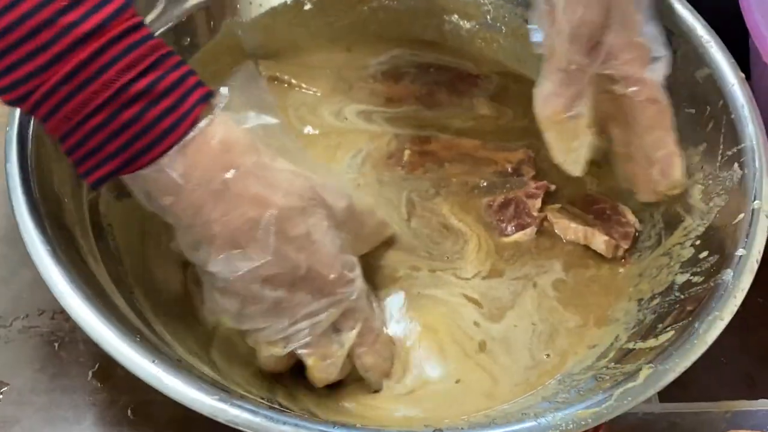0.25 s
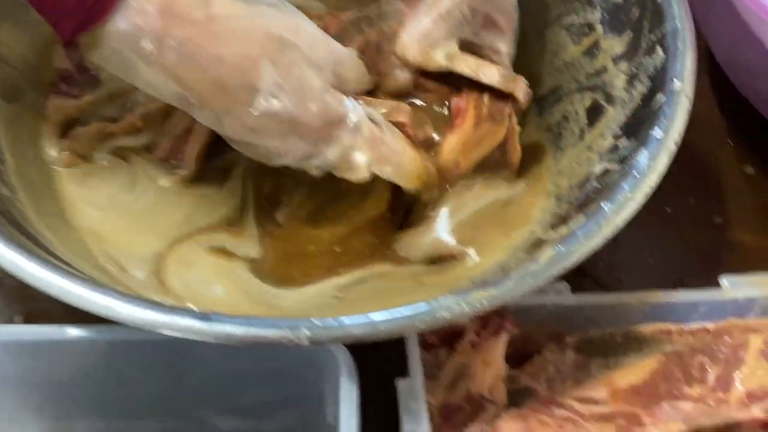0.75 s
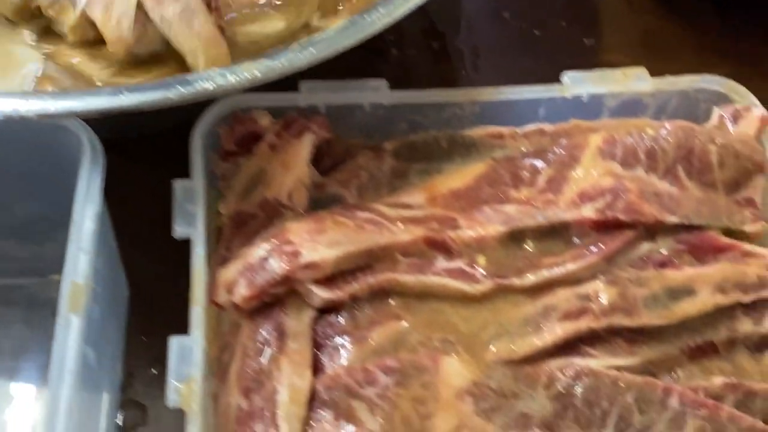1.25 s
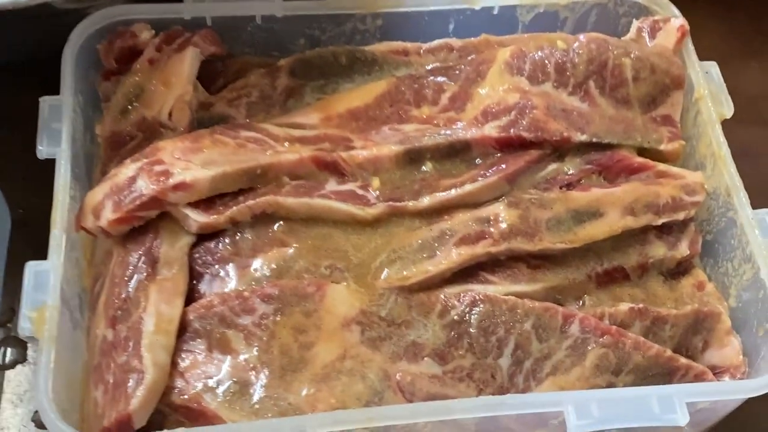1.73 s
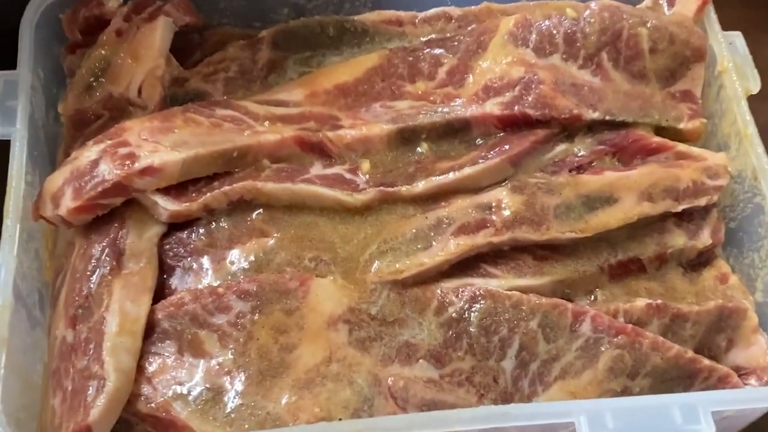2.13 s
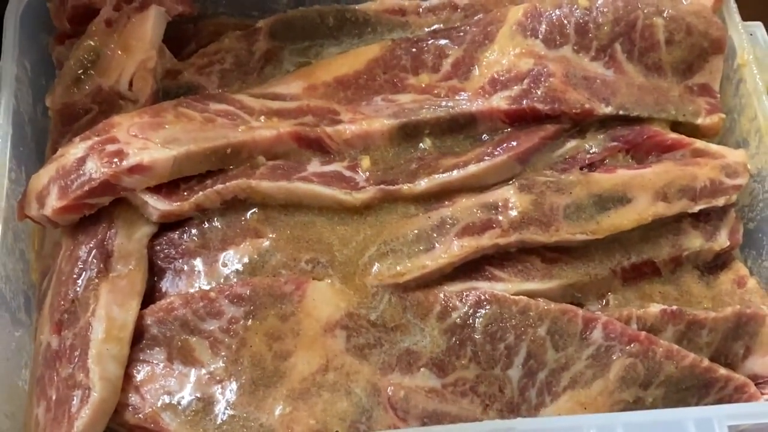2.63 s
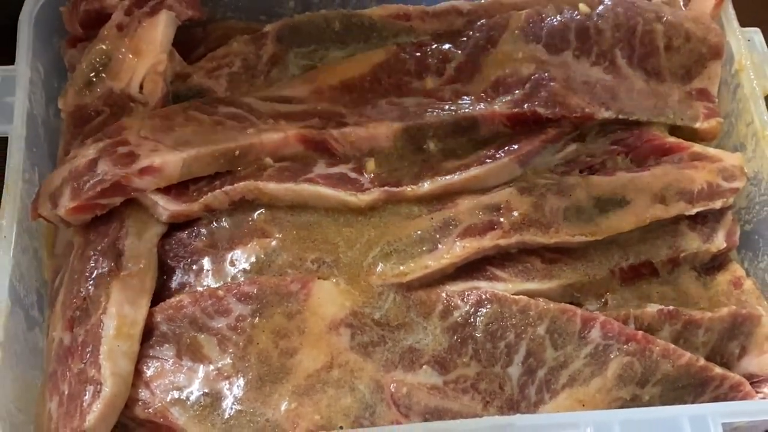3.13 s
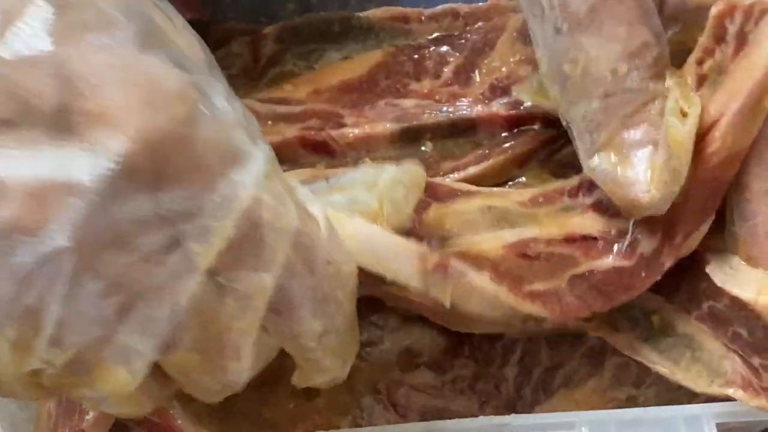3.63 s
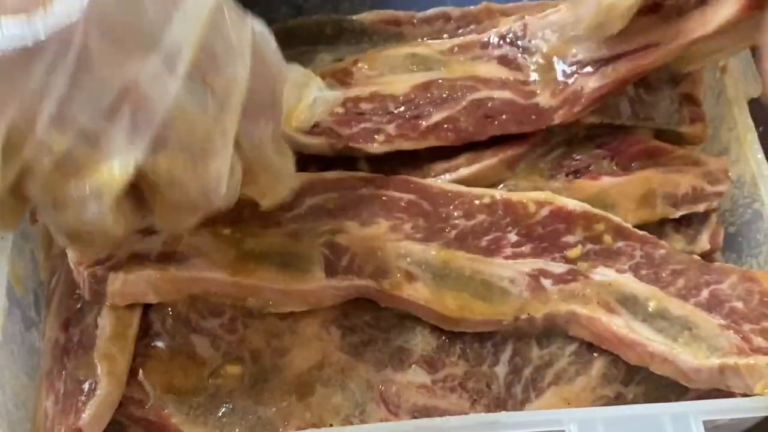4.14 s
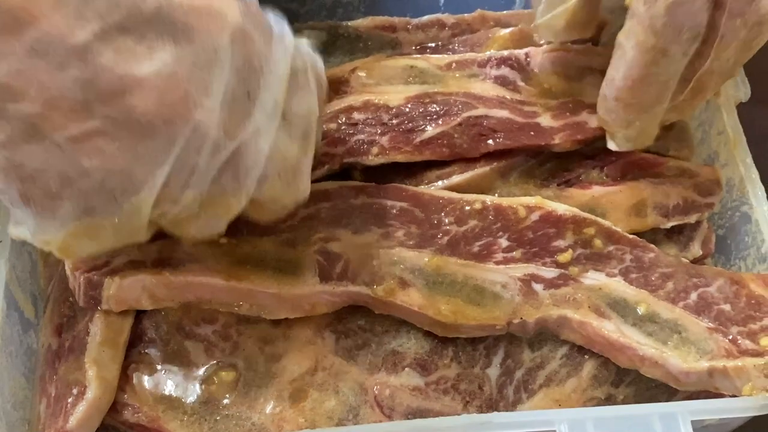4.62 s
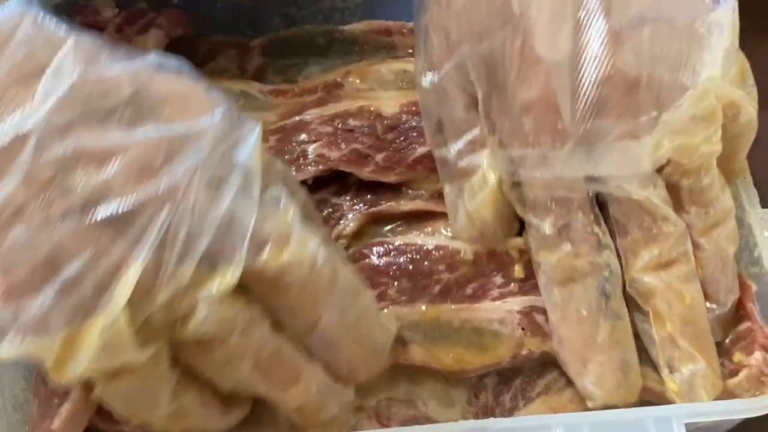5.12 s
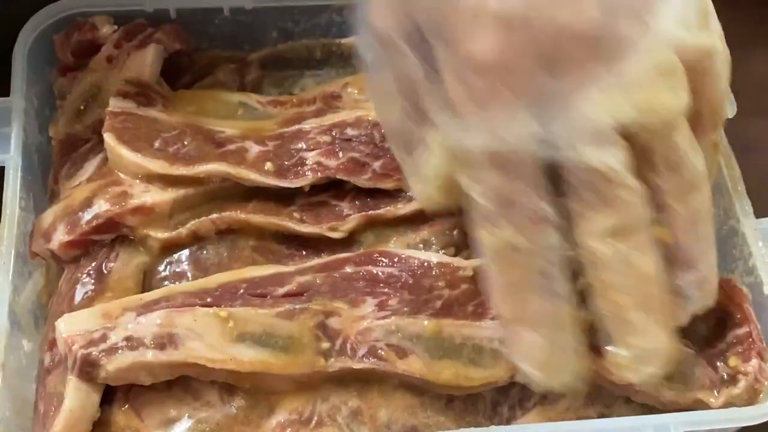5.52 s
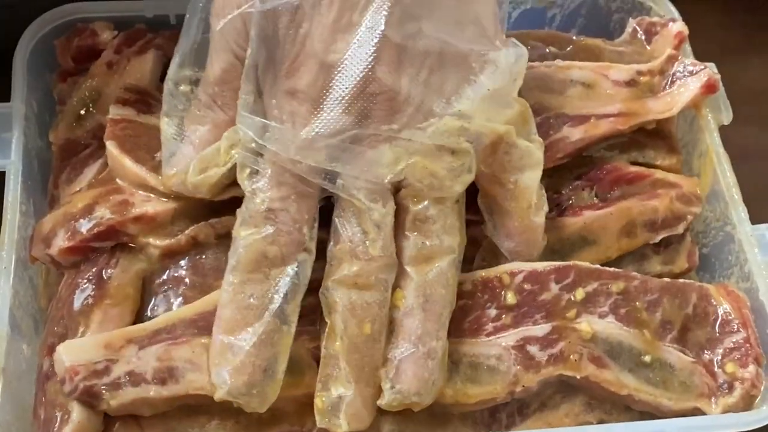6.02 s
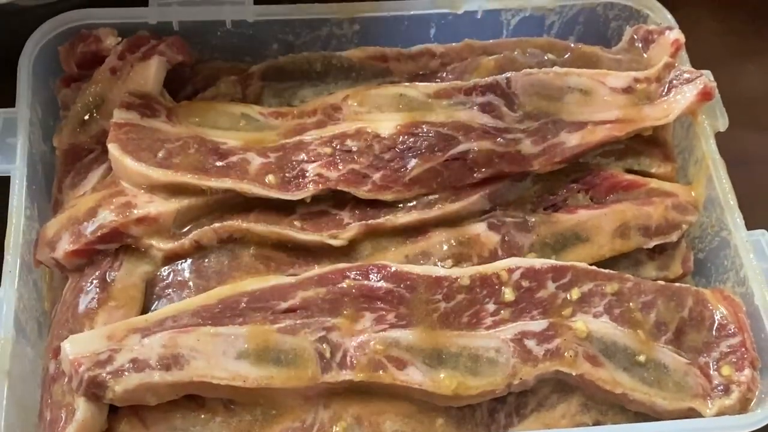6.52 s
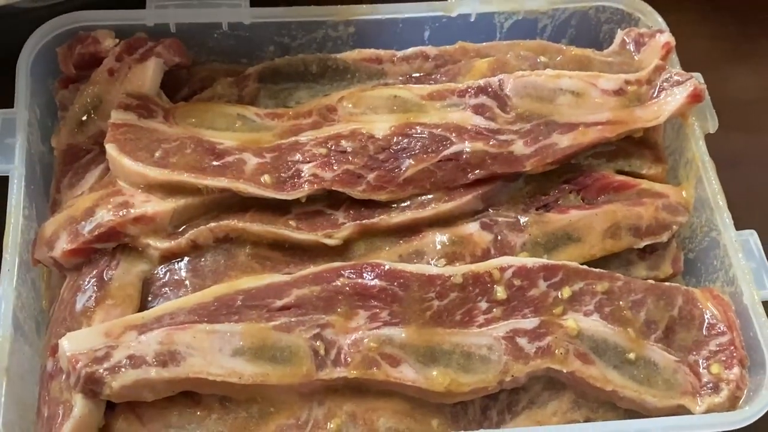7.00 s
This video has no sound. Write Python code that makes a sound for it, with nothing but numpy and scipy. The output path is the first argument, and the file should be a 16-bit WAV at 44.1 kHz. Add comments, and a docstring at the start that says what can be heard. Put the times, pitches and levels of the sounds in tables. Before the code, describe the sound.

Close kitchen handling of slimy marinated ribs: rustling film gloves, soft squishes and snaps, low rumble, and finally one hard, resonant table knock.

```python
"""Hands in thin plastic gloves move marinated ribs from a steel bowl to a plastic box, in a kitchen.
From the start, grain swarms make film crinkle and wet squelch; decaying tones make snaps, plops and bumps.
At 1.6 s damped modes make the box clack and rattle; from 2.3 s the low noise rumble eases by 4 dB.
Near 6.7 s a heavy edge knocks: a burst of contacts and noise, with the table's modes ringing on.
A faint appliance hum, a sine with coloured noise, and room air run throughout."""
import sys
import numpy as np
from scipy import signal
from scipy.fft import rfft, irfft, next_fast_len
from scipy.io import wavfile
from scipy.ndimage import uniform_filter1d

SR = 44100
rng = np.random.default_rng(int(sys.argv[2]) if len(sys.argv) > 2 else 0)


def wav_record(signal):
    """Record a signal, one row per channel, as 16-bit PCM in the file named by sys.argv[1]."""
    frames = np.transpose(np.atleast_2d(signal))
    bounded = np.clip(frames, -1, 1)
    # unit amplitude maps onto the largest positive 16-bit level
    quanta = np.round(bounded * 32767).astype(np.int16)
    wavfile.write(sys.argv[1], SR, quanta)


N = 320166  # samples

# spectrum of crinkling film: (frequency [Hz], relative level per Hz [dB])
FILM_SPECTRUM = [(500, -18), (1300, -5), (1900, -4.5), (2500, 0), (3500, -0.5), (4300, -4.5), (5600, -1.5),
                 (7300, -2.5), (8800, -9.5), (12500, -14.5), (16000, -20.5)]


def gloves():
    """Folds buckle in swarms; stronger effort is denser, louder, fuller; light effort thin, near 5 kHz."""
    level_db = hand_effort(column=0)
    speed = amp(level_db + 47)
    fold_rate_hz = np.clip(2500 * speed, 70, 6000)
    pop_rate_hz = np.clip(800 * speed, 50, 2000)
    folds = grains(fold_rate_hz, hz=5294, spread=1.705, cycles=0.576, size_db=4.0, glide=0, size=128)
    # wet film peeling off the meat pops with a pitch of its own
    pops = grains(pop_rate_hz, hz=3413, spread=1.36, cycles=2.3, size_db=4.0, glide=0.062, size=320)
    firm = patchy(coloured(folds + amp(-3.5) * pops, FILM_SPECTRUM), depth_db=1.6)
    light = coloured(firm, [(1500, -3.0), (5000, 9.5), (8000, -2.5), (15000, -6)])
    firm_share = np.clip(2.68 * speed, 0, 1)
    film = steadied(firm_share * firm + (1 - firm_share) * light, seconds=0.0312)
    return in_kitchen(amp(level_db) * film, wet_db=-9, near_db=-5)


# spectrum of squeezed wet meat: (frequency [Hz], relative level per Hz [dB])
WET_SPECTRUM = [(120, -11), (300, -8.5), (450, -5.5), (700, -4), (1080, 0), (1400, -7.5), (2000, -10),
                (3500, -10.5)]


def squelch():
    """Small air pockets burst in the marinade as the meat is squeezed."""
    level_db = hand_effort(column=1)
    bubbles = grains(900, hz=889.2, spread=1.3645, cycles=2.57, size_db=3.5, glide=0.152, size=640)
    bubbles = steadied(coloured(bubbles, WET_SPECTRUM), seconds=0.0276)
    return in_kitchen(amp(level_db) * bubbles, wet_db=-7, near_db=-11.0)


# single film folds and wet films that snap: (time [s], level [dB], pitch [Hz])
FILM_SNAPS = [(.023, -30.5, 4000), (0.2207, -31, 4740), (0.8747, -24.5, 5860), (1.1555, -35, 2290),
              (1.414, -32, 2930), (1.5551, -36, 2660), (2.132, -31.5, 6800), (2.459, -30, 4261),
              (2.602, -32.5, 7750), (2.928, -32, 3580), (3.1871, -34, 2131), (3.21, -34.5, 5944),
              (3.249, -31, 2660), (3.489, -31.5, 5762), (3.5476, -31, 6205), (3.5719, -28.5, 2860),
              (3.7271, -34.5, 3309), (3.8767, -31, 6520), (3.8944, -22.5, 3596), (3.9507, -29, 5700),
              (4.0198, -26.5, 2590), (4.041, -26, 5870), (4.156, -32, 2400), (4.175, -32.5, 3930),
              (4.217, -19, 3665), (4.4094, -22, 6601), (4.703, -29, 5550), (4.7541, -27, 6063),
              (5.8154, -30.5, 4409), (6.1253, -30.5, 3125), (6.19, -30, 3300), (6.3225, -34, 2700),
              (6.367, -30, 7195), (6.413, -31, 5208), (6.6909, -36.5, 3439), (6.774, -36, 5342),
              (6.94, -40.5, 6000), (7.114, -48, 4400)]


def snaps():
    """A larger fold flips over: a sharp tick and a few cycles of its own pitch."""
    out, t = np.zeros(N), np.arange(SR // 50) / SR
    for s, db, hz in FILM_SNAPS:
        tone = np.sin(2 * np.pi * hz * t) * np.exp(-hz * t / 4.13)
        tick = 0.81 * rng.standard_normal(len(t)) * np.exp(-t / 0.00187)
        add(out, s, amp(db) * (tone + tick))
    out = coloured(out, [(200, -9.5), (1200, -13.5), (2800, -3.5), (7500, -1.5), (9500, -10.5), (15000, -20.5)])
    return in_kitchen(out, wet_db=-12.5, near_db=-10.5)


# blobs of marinade and meat that plop: (time [s], level [dB], starting pitch [Hz])
MEAT_PLOPS = [(.927, -29.5, 1301), (0.9297, -30, 984), (.938, -31.5, 1081), (.993, -38.5, 1004),
              (1.414, -35, 1453), (1.724, -37, 574), (1.736, -36.5, 902), (1.838, -39, 867),
              (2.195, -41.5, 1097), (3.096, -44, 904), (3.486, -35.5, 951.3), (3.489, -36, 506),
              (5.322, -35.5, 939.2), (5.875, -32.5, 589.9), (6.54, -35.5, 948.7)]


def plops():
    """A trapped pocket of air rings briefly and rises in pitch, with a little spatter."""
    out, t = np.zeros(N), np.arange(SR // 12) / SR
    for s, db, hz in MEAT_PLOPS:
        tone = np.sin(2 * np.pi * hz * t * (1 + 2.5 * t))
        pocket = tone * np.exp(-hz * t / 2.28) * (1 - np.exp(-t / 0.00033))
        spatter = softened(rng.standard_normal(len(t)), hz * 2.27) * np.exp(-t / 0.0194)
        spatter -= softened(spatter, hz / 3)
        add(out, s, amp(db) * (crest(pocket) + 0.319 * crest(spatter)))
    return in_kitchen(out, wet_db=-2.5, near_db=-1.5)


# contacts of the heavy edge as it chatters and settles: (time [s], level [dB], pitch [Hz])
KNOCK_CONTACTS = [(6.7193, -15, 638.5), (6.722, -2, 720), (6.7266, -6, 1110), (6.73, -2.5, 1375),
                  (6.7432, -30.5, 900), (6.7503, -21, 805), (6.774, -18.5, 1090), (6.838, -19, 760),
                  (6.874, -25.5, 553.8)]
# table modes, also woken by bumps: (frequency [Hz], relative level [dB], t60 [s])
TABLE_MODES = [(116.22, -3.5, 0.8327), (147, -4, 0.8214), (171.6, -3.5, 0.67), (221.7, -2, 0.649),
               (298.8, -6.5, 0.42), (391.3, 0.5, 0.15), (491, 1, 0.2615), (516.6, -17.5, 0.4285),
               (667, 0, 0.26), (764.7, -6.5, 0.46), (832.5, 3, 0.354), (865, -12.5, 0.37), (1043, 0, 0.264),
               (1085.3, 5, 0.26), (1190, -2, 0.216), (1830, -17, 0.235), (2450, -17, 0.156),
               (2665, -7.5, 0.158), (3794, -14.5, 0.212)]
# spectrum of the heavy thud: (frequency [Hz], relative level [dB])
THUD_SPECTRUM = [(40, -9.5), (80, -7.5), (130, -0.5), (320, -3), (500, 3), (1150, 1.5), (1600, -16),
                 (2700, -20.5), (4200, -29.5), (7500, -40), (15000, -63)]


def knock():
    """A heavy edge hits the table in quick contacts; the table rings on and the room answers."""
    blows, out, t = np.zeros(N), np.zeros(N), np.arange(SR * 3 // 4) / SR
    for s, db, hz in KNOCK_CONTACTS:
        add(blows, s, amp(db) * np.sin(2 * np.pi * hz * t) * np.exp(-hz * t / 0.55))
    out += amp(-8.5) * crest(coloured(blows, THUD_SPECTRUM))
    # countless close modes blur into a shudder: a quick part and the long tail of the room
    fading = np.exp(-t / 0.0126) + amp(-5.5) * amp(-60 * t / 0.477)
    shudder = unit(coloured(rng.standard_normal(len(t)), THUD_SPECTRUM)) * fading
    crack = softened(rng.standard_normal(len(t)), hz=3300) * np.exp(-t / 0.0059)
    modes = ring(TABLE_MODES, t, scatter_db=-1.5) * (1 - np.exp(-t / 0.00156))
    first_contact_s = KNOCK_CONTACTS[0][0]
    add(out, first_contact_s, amp(-20) * shudder + amp(-24.5) * crack + amp(-31.5) * modes)
    return out


# flick and brief rattle of the box: (time [s], level [dB])
BOX_CLACKS = [(1.5684, -27.5), (1.577, -40.5), (1.5837, -41.5), (1.593, -52)]
# plastic box modes: (frequency [Hz], relative level [dB], t60 [s])
BOX_MODES = [(458.9, -18.5, 0.0501), (515.8, -15.5, 0.14), (611, -14.5, 0.069), (785.8, -13, 0.057),
             (952, -16.5, 0.036), (1691, -18.5, 0.065), (2836, 1.5, 0.0127), (3050, -18, 0.086),
             (3419, -13, 0.061), (3784, -4.5, 0.033), (4510, -2, 0.0086), (6220, 1.5, 0.0063),
             (7300, 1, 0.0069), (7870, -4, 0.0088), (10240, -3.5, 0.0062)]


def box_clack():
    """Something hard flicks the plastic box, which rattles to rest."""
    out, t = np.zeros(N), np.arange(SR // 6) / SR
    for s, db in BOX_CLACKS:
        crack = 1.22 * rng.standard_normal(len(t)) * np.exp(-t / 0.00091)
        add(out, s, amp(db) * (ring(BOX_MODES, t, scatter_db=1.0) + crack))
    out = coloured(out, [(800, 7), (1400, 3.5), (2300, -5), (2800, -1.5), (7800, 2), (9000, -2.0), (15000, -8)])
    return in_kitchen(out, wet_db=-9.5, near_db=-8.0)


# dull bumps on the table top: (time [s], level [dB], brightness [Hz])
TABLE_BUMPS = [(0.119, -41, 403), (1.149, -42.5, 126), (1.729, -36, 169), (1.825, -32, 102),
               (2.41, -41, 171.1), (4.304, -37, 505), (4.338, -37, 55.04), (5.517, -39.5, 331.5)]


def bumps():
    """Soft weight lands on the table: a short dull shudder and mostly its lower modes."""
    out, t = np.zeros(N), np.arange(SR // 2) / SR
    for s, db, hz in TABLE_BUMPS:
        shudder = softened(rng.standard_normal(len(t)), hz * 2.5) * amp(-60 * t / 0.092)
        shudder -= softened(shudder, hz / 4)
        modes = softened(ring(TABLE_MODES, t, scatter_db=1), hz) * amp(-60 * t / 0.96)
        bump = amp(1.5) * crest(shudder) + amp(-3.5) * crest(modes)
        add(out, s, amp(db) * softened(bump, hz * 1.44))
    return in_kitchen(out, wet_db=-10.5, near_db=-14)


# meat's weight shifting in bowl or box: (start [s], length [s], level [dB])
MEAT_SHOVES = [(.04, 0.074, -47), (.3, 0.903, -44), (1.33, 0.176, -51.5), (1.7, 0.697, -51.5),
               (3.15, 0.152, -51.5), (4.31, 0.079, -44), (6.7, 0.086, -40)]
# spectra of low rumble, soft jostling, room air: (frequency [Hz], relative level per Hz [dB])
RUMBLE_SPECTRUM = [(2, -12.5), (7, 7), (14, 1.5), (22, -10.5), (30, -7), (42, -30), (70, -34), (150, -88)]
JOSTLE_SPECTRUM = [(25, -29), (52, 7.5), (76, 0.5), (100, -22.5), (200, -26.5), (400, -46), (1000, -76.5)]
AIR_SPECTRUM = [(59, -28.5), (100, -5), (113, -3.5), (236, -3.5), (407, -9.5), (452, -7.5), (1070, -11),
                (2130, -15.5), (2420, -15.5), (4350, -20.5), (8000, -30.5), (12200, -36.5), (15000, -72)]
REST_JOSTLE_DB = -54  # the table under leaning arms
RUMBLE_EASE_START_S, RUMBLE_EASE_LENGTH_S = 2.325, 0.38
RUMBLE_EARLY_DB, RUMBLE_LATE_DB = -32, -36


def background():
    """Low rumble and soft jostling as steadied noise; hum as a sine in noise; room air as noise."""
    t = np.arange(N) / SR
    ease_s = [RUMBLE_EASE_START_S, RUMBLE_EASE_START_S + RUMBLE_EASE_LENGTH_S]
    rumble_db = np.interp(t, ease_s, [RUMBLE_EARLY_DB, RUMBLE_LATE_DB])
    rumble = amp(rumble_db) * steadied(noise(RUMBLE_SPECTRUM), seconds=0.458)
    jostle_db = effort(MEAT_SHOVES, REST_JOSTLE_DB)
    jostle = amp(jostle_db) * steadied(noise(JOSTLE_SPECTRUM), seconds=0.0765)
    hum = amp(-62) * np.sin(2 * np.pi * 149.5 * t)
    fan = amp(-63.0) * noise([(200, -19.0), (450, -6.0), (700, -5), (1100, -3.0), (1400, -16.5), (3000, -37)])
    air = amp(-60) * noise(AIR_SPECTRUM)
    return rumble + jostle + hum + fan + air


# grips, lifts, presses: (start [s], length [s], glove crinkle level [dB], wet squelch level [dB])
HAND_STROKES = [(0.0, 0.19, -52.5, -56), (0.202, 0.2563, -54, -54.5), (.45, 0.292, -55.5, -58),
                (.75, .07, -49.5, -51), (0.949, 0.0672, -49, -62.5), (1.129, 0.3764, -57, -52),
                (1.591, .1, -57.5, -61.5), (1.785, 0.0516, -51.5, -51), (1.9, 0.151, -53.5, -56),
                (2.148, 0.1008, -50, -51.5), (2.32, 0.0628, -50.5, -53.5), (2.489, 0.133, -57.5, -62.5),
                (2.62, 0.1376, -57.5, -63.5), (2.873, 0.0633, -59, -66), (3.129, .135, -60.5, -62),
                (3.369, 0.1082, -47.5, -51), (3.527, 0.0968, -51.5, -57.5), (3.709, 0.1833, -57, -61),
                (3.94, 0.1342, -47, -52), (4.152, 0.119, -50, -56.5), (4.309, 0.1603, -49, -48),
                (4.561, 0.0984, -48, -50.5), (4.716, 0.15, -44.5, -49.5), (4.848, 0.1337, -46, -49.5),
                (5.074, .14, -50, -53), (5.259, 0.1091, -49, -46), (5.306, 0.0412, -45.5, -44),
                (5.435, 0.0743, -46.5, -49), (5.542, 0.067, -59, -60), (5.698, 0.2972, -53, -53.5),
                (5.8, 0.139, -52, -51), (5.855, 0.0264, -56, -45), (6.107, 0.1218, -52, -56),
                (6.259, 0.1286, -52, -56), (6.52, 0.099, -58, -60), (6.716, 0.236, -65.5, -63.5)]
# light contact that goes on between strokes: (time [s], level [dB])
LIGHT_CONTACT = [(0.0, -61.5), (2.4, -61.5), (2.9, -74), (3.3, -74), (4.2, -61), (5.2, -62), (6.4, -62),
                 (7.0, -77)]


def hand_effort(column):
    """Level in dB of the strokes over the light contact; column 0 is the glove, 1 the wet meat."""
    contact_db = np.interp(np.arange(N) / SR, *np.transpose(LIGHT_CONTACT))
    strokes = [(start, length, levels[column]) for start, length, *levels in HAND_STROKES]
    return effort(strokes, contact_db)


ATTACK_S, RELEASE_S = .03, .03  # linear onset; decay to 1/e
ARCH_DB = 1.58  # middle of a stroke over its ends


def effort(strokes, rest_db):
    """Level in dB of (start, length, dB) strokes: each takes hold, swells to its middle and lets go."""
    t = np.arange(N) / SR
    power = np.full(N, amp(rest_db) ** 2)
    for start, length, db in strokes:
        age = t - start
        grip = np.clip(age / ATTACK_S, 0, 1) * np.exp(-np.maximum(age - length, 0) / RELEASE_S)
        arch_db = ARCH_DB * (np.sin(np.pi * np.clip(age / length, 0, 1)) - .5)
        power += (grip * amp(db + arch_db)) ** 2
    return 10 * np.log10(power)


# decay of the room: (frequency [Hz], t60 [s])
KITCHEN_DECAY = [(120, 0.706), (500, 0.413), (1200, 0.424), (4000, 0.56), (12000, 0.218)]


def in_kitchen(x, wet_db, near_db):
    """Direct sound, quick echoes off table and bowl, and the softened tail of the room."""
    hz, t, z = signal.stft(rng.standard_normal(SR * 3 // 4), SR, nperseg=256)
    decay_db = -60 * t / along(KITCHEN_DECAY, hz)[:, None]
    tail = signal.istft(z * amp(decay_db), SR, nperseg=256)[1]
    age = np.arange(len(tail)) / SR
    tail *= 1 - np.exp(-age / 0.00187)
    near = rng.standard_normal(len(tail)) * age * amp(-60 * age / 0.01433)
    answer = amp(wet_db) * tail / np.linalg.norm(tail) + amp(near_db) * near / np.linalg.norm(near)
    return x + signal.fftconvolve(x, softened(answer, hz=9000))[:N]


def grains(rate, hz, spread, cycles, size_db, glide, size):
    """A random swarm of tiny damped rings, mostly small and a few large, at rms 1."""
    start = np.flatnonzero(rng.random(N) < rate / SR)
    chance = rng.random((len(start), 4))
    pitch = np.clip(hz * np.exp(spread * (chance[:, :1] + chance[:, 1:2] - 1)), 50, SR / 2.5)
    strength = amp(size_db * np.minimum(-np.log(1 - chance[:, 2:3]), 5))
    age = pitch * np.arange(size) / SR / cycles  # in decay times
    turns = cycles * age * (1 + glide * np.tanh(age / 2))
    wave = strength * pitch * np.exp(-age) * np.sin(2 * np.pi * turns)
    wave *= np.sign(chance[:, 3:] - .5)
    place = start[:, None] + np.arange(size)
    return unit(np.bincount(place.ravel(), wave.ravel(), N + size)[:N])


def patchy(x, depth_db):
    """The colour keeps changing as the film folds into new shapes."""
    z = signal.stft(x, nperseg=256)[2]
    field = uniform_filter1d(uniform_filter1d(rng.standard_normal(z.shape), 7, 0), 9, 1)
    return signal.istft(z * amp(depth_db * unit(field)), nperseg=256)[1][:N]


def steadied(x, seconds):
    """Evens out strength over the given time, keeping single grains."""
    width = max(int(seconds * SR), 2)
    power = uniform_filter1d(uniform_filter1d(x ** 2, width), width)
    return x / np.sqrt(np.abs(power) + 1e-4)


def ring(modes, t, scatter_db):
    """Damped modes of alternating sign, each at a slightly new strength."""
    out = np.zeros(len(t))
    for k, (hz, db, t60) in enumerate(modes):
        level_db = db + scatter_db * rng.normal() - 60 * t / t60
        out += (-1) ** k * amp(level_db) * np.sin(2 * np.pi * hz * t)
    return out


def noise(spectrum):
    """Coloured noise of rms 1."""
    return unit(coloured(rng.standard_normal(N), spectrum))


def coloured(x, spectrum):
    """x through a causal minimum-phase filter with the given (Hz, dB) shape."""
    m = 2 * next_fast_len((len(x) + SR // 2) // 2)
    gain = amp(along(spectrum, np.fft.rfftfreq(m, 1 / SR)))
    cepstrum = irfft(np.log(gain), m)
    cepstrum[1:m // 2] *= 2
    cepstrum[m // 2 + 1:] = 0
    return irfft(rfft(x, m) * np.exp(rfft(cepstrum)), m)[:len(x)]


def softened(x, hz):
    """A soft contact passes little above hz: second-order low-pass."""
    return signal.sosfilt(signal.butter(2, min(hz, SR / 3), fs=SR, output="sos"), x)


def along(points, hz):
    """(Hz, value) points read on a log axis."""
    f, v = np.transpose(points)
    return np.interp(np.log(hz + 1), np.log(f + 1), v)


def amp(db):
    """Decibels to gain."""
    return 10 ** (np.asarray(db) / 20)


def unit(x):
    """x at rms 1."""
    return x / np.sqrt(np.mean(x ** 2) + 1e-20)


def crest(x):
    """x at peak 1."""
    return x / np.abs(x).max()


def add(track, s, x):
    """Mix x into the track from time s."""
    part = track[max(round(s * SR), 0):][:len(x)]
    part += x[:len(part)]


def scene():
    """Everything at the table, heard by one microphone."""
    hands = gloves() + squelch() + snaps() + plops()
    hits = box_clack() + bumps() + knock()
    return (hands + hits + background())[None]


TOP_HZ = 15950


def record(dry):
    """Brick-wall low-pass: nothing passes from TOP_HZ up."""
    m = next_fast_len(N + SR // 2)
    passed = np.fft.rfftfreq(m, 1 / SR) < TOP_HZ
    return irfft(rfft(dry, m) * passed, m)[..., :N]


dry = scene()
out = record(dry)
wav_record(out)
```